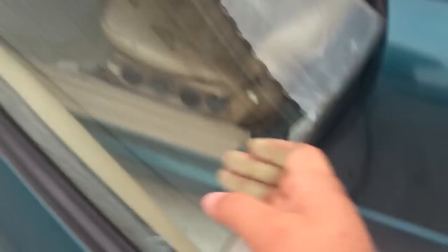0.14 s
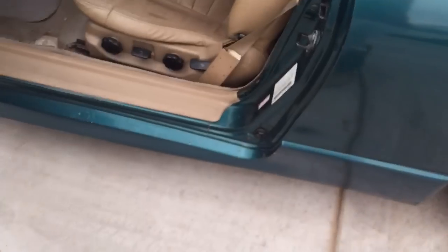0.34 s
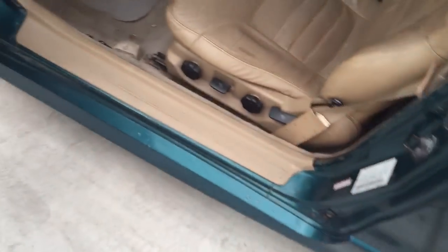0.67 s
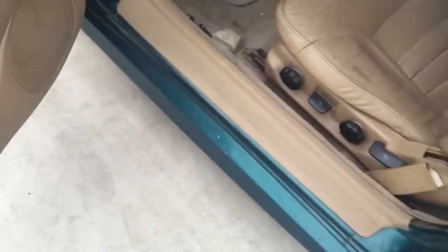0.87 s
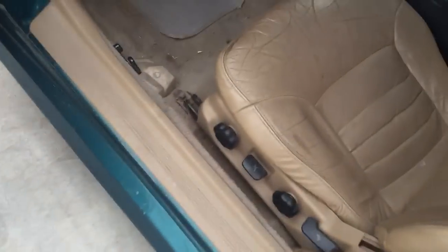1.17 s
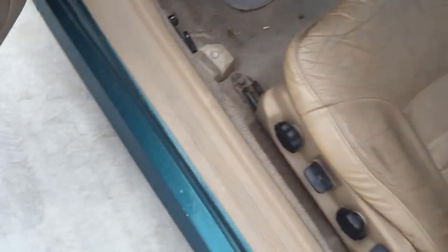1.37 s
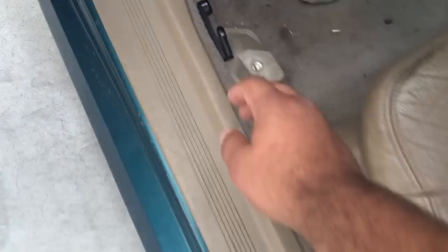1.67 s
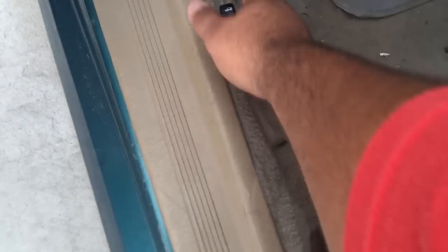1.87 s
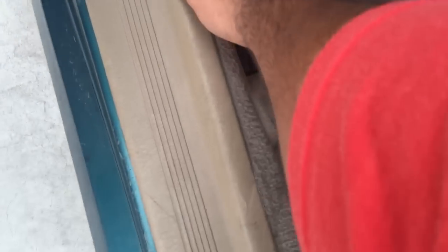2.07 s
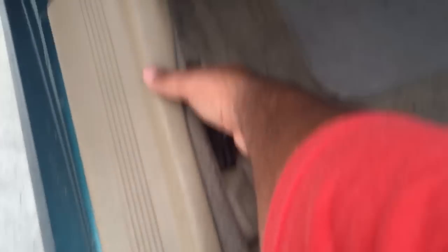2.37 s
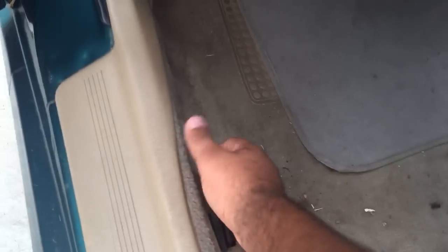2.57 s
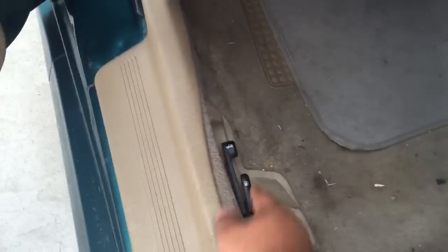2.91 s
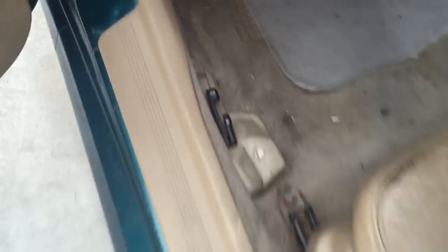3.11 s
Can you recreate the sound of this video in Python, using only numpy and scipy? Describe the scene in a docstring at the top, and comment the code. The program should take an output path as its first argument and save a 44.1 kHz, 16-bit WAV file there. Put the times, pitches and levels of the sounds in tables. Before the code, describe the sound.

A car door clicks off its catch at 0 and 0.1 s, its hinge rubbing unevenly with tiny squeaks until 0.85 s; hollow panel knocks land at 0.59 and 0.73 s. Clothing brushes near 1.1 s, a soft door bump at 1.6 s, faint trim taps around 2.2 s, carpet rubs at 2.6 s. A lever thumps dully at 2.7 s, ticks, scrapes, then clacks loudest at 2.92 s. Close, dry, quiet outdoor air, low wind buffets.

```python
"""A car door swings open outdoors: the hinge rubs, the check strap knocks the panel, clothes brush past.
Then a hand pulls a floor lever: a dull thump, two ticks, a short scrape and a sharp latch clack.
Wind buffets the microphone. Blows ring clusters of decaying modes and leave a crack of noise; rubs, brushes,
scrape and wind are shaped noise; squeaks are narrow-band noise; faint tones and low bumps are sines."""
import sys
import numpy as np
from scipy import signal
from scipy.fft import rfft, irfft, next_fast_len
from scipy.io import wavfile
from scipy.ndimage import uniform_filter1d, map_coordinates

SR = 44100
rng = np.random.default_rng(int(sys.argv[2]) if len(sys.argv) > 2 else 0)


def file_out(sig):
    """Save sig as 16-bit WAV at sys.argv[1]."""
    # one column per channel
    cols = np.atleast_2d(sig).T
    # limit, then scale
    lim = np.clip(cols, -1, 1)
    pcm = np.round(lim * 32767).astype(np.int16)
    wavfile.write(sys.argv[1], SR, pcm)


def voltage_ratio(level):
    """Linear amplitude factor for a level in decibels (scalar or array-like)."""
    return 10 ** (np.asarray(level, float) / 20)


N = 143325

# crack spectrum of the door: (frequency [Hz], density [dB])
DOOR_CRACK_COLOUR = [(710, -18), (1200, -10.5), (2190, -2.5), (4830, -10), (5980, -8), (8700, -19.5),
                     (9680, -29), (12000, -19), (15500, -31)]
DOOR_CRACK_T60_S = 0.092


def unit(x):
    """Scaled to rms 1."""
    return x / np.sqrt(np.mean(x ** 2) + 1e-20)


def peak(x):
    """Scaled so that its strongest 5 ms has rms 1."""
    return x / np.sqrt(np.abs(uniform_filter1d(x ** 2, SR // 200)).max() + 1e-20)


def curve(rows):
    """One value per sample from (time [s], value) rows."""
    return np.interp(np.arange(N) / SR, *np.transpose(rows))


def wobble(rate_hz):
    """A smooth random curve, rate_hz knots a second."""
    knots = rng.standard_normal(int(N * rate_hz / SR) + 4)
    return map_coordinates(knots, [np.arange(N) * rate_hz / SR])


def noise(spectrum, size, tilt_db=0):
    """Noise of rms 1 coloured by (Hz, dB) points, tilted by tilt_db per octave about 4 kHz."""
    m = next_fast_len(size)
    hz, db = np.transpose(spectrum)
    octave = np.log2(np.fft.rfftfreq(m, 1 / SR) + 1)
    colour_db = np.interp(octave, np.log2(hz), db, left=-120, right=-120)
    gain = voltage_ratio(colour_db + tilt_db * (octave - np.log2(4000)))
    return unit(irfft(rfft(rng.standard_normal(m)) * gain, m)[:size])


def add(track, s, x):
    """Mixes x into the track at s seconds."""
    part = track[max(round(s * SR), 0):][:len(x)]
    part += x[:len(part)]


def ringing(modes, contact, t, spread):
    """Every mode is a cluster of close, detuned partials, new for each blow and set going by the contact."""
    phase_scatter_rad = 1.36  # partials start roughly together, then drift apart
    hz, db, t60_s = np.transpose(modes)[:, :, None, None]
    draw = rng.standard_normal((3, len(modes), 14, 1))
    decay = voltage_ratio(-60 * t / (t60_s * np.exp(0.23 * draw[0])))
    phase = 2 * np.pi * hz * (1 + spread * draw[1]) * t + phase_scatter_rad * draw[2]
    onset = 1 - np.exp(-hz * t)
    clusters = (decay * np.sin(phase) * onset).sum(axis=1)
    rung = signal.fftconvolve(clusters, contact[None], axes=1)[:, :len(t)]
    highpass = signal.butter(2, 0.69 * hz.min(), "high", fs=SR, output="sos")
    rung = signal.sosfilt(highpass, rung)
    return peak(sum(voltage_ratio(mode_db) * peak(one) for mode_db, one in zip(db.ravel(), rung)))


def hits(events, low_modes, mid_modes, crack, crack_t60_s, low_spread, mid_spread):
    """Each blow is a short rough contact that rings two sets of modes and leaves a dying crack."""
    echo_db, echo_t60_s, echo_tilt_db = -23, 0.15, -4.5  # lingering echo of the crack; tilt per octave
    grit_db = 2.5  # unevenness of the crack
    track, t = np.zeros(N), np.arange(SR // 3) / SR
    for s, crack_db, low_db, mid_db, contact_s in events:
        u = t / contact_s
        contact = (rng.standard_normal(len(t)) * np.sqrt(u) * np.exp(-2 * u * u))[:SR // 5]
        after_s = np.maximum(t - 0.81 * contact_s, 0)
        echo = voltage_ratio(echo_db - 60 * after_s / echo_t60_s) * noise(crack, len(t), echo_tilt_db)
        direct = voltage_ratio(-60 * after_s / crack_t60_s) * noise(crack, len(t))
        snap = (1 - np.exp(-8 * u)) * (direct + echo)
        grit = voltage_ratio(grit_db * wobble(300)[:len(t)])
        low = voltage_ratio(low_db) * ringing(low_modes, contact, t, low_spread)
        mid = voltage_ratio(mid_db) * ringing(mid_modes, contact, t, mid_spread)
        add(track, s, low + mid + voltage_ratio(crack_db) * peak(grit * snap))
    return track


def strokes(rows, colour):
    """Short strokes: patchy, grainy noise that swells under the stroke and dies away after it."""
    swell_share, fade_t60_s = 0.5, 0.039  # swell as share of the stroke
    patch_db, fibre_db, slow_db = 3, 1, 1.8
    track, t = np.zeros(N), np.arange(SR // 2) / SR
    for s, length_s, db, tilt_db in rows:
        swell = np.sin(np.pi / 2 * np.clip(t / (swell_share * length_s), 0, 1))
        fading = voltage_ratio(-60 * np.maximum(t - 0.86 * length_s, 0) / fade_t60_s)
        add(track, s, voltage_ratio(db) * swell * fading * noise(colour, len(t), tilt_db))
    z = signal.stft(track, nperseg=128)[2]
    field = uniform_filter1d(rng.standard_normal(z.shape), 4, axis=0)
    field = uniform_filter1d(field, 4, axis=1)
    patchy = signal.istft(z * unit(voltage_ratio(patch_db * unit(field))), nperseg=128)[1][:N]
    return patchy * unit(voltage_ratio(fibre_db * wobble(500) + slow_db * wobble(70)))


def hush():
    """Quiet outdoor air: steady coloured noise, slightly wavering."""
    # (frequency [Hz], density [dB])
    air_colour = [(41, -31), (70, -10), (118, -3), (151, -11), (186, -4.5), (342, -16.5), (481, -21.5),
                  (564, -18), (676, -26.5), (887, -23.5), (1090, -26), (9170, -37), (15800, -42)]
    return voltage_ratio(-65 + 0.7 * wobble(3)) * noise(air_colour, N)


def wind():
    """Wind lumps on the microphone: low noise under a gust envelope."""
    # (time [s], level [dB])
    gusts = [(0.0, -45.5), (0.32, -100), (0.37, -50), (0.42, -63), (0.44, -51), (0.54, -74), (0.61, -70),
             (0.74, -67), (0.93, -47), (1.03, -58.5), (1.24, -69), (1.27, -43), (1.28, -44), (1.33, -59),
             (1.36, -52), (1.43, -95), (1.49, -54), (1.57, -96), (1.76, -60), (1.8, -79), (1.99, -55.5),
             (2.05, -70.5), (2.3, -53), (2.33, -65.5), (2.705, -59.5), (2.72, -37), (2.74, -45),
             (2.85, -49.5), (3.18, -69), (3.25, -66)]
    # (frequency [Hz], density [dB])
    buffet_colour = [(20, -50), (35, -20.5), (55, 4), (85, -4), (130, -7), (250, -29.5)]
    return voltage_ratio(curve(gusts)) * noise(buffet_colour, N)


def faint_tones():
    """Faint held sines, wavering in level and pitch."""
    # (frequency [Hz], level [dB], start [s], end [s])
    tone_rows = [(563, -73, 1.84, 2.85), (333, -76.5, 0.79, 1.85)]
    fade_s = 0.089
    t, track = np.arange(N) / SR, np.zeros(N)
    for hz, db, from_s, to_s in tone_rows:
        on = np.clip((t - from_s) / fade_s, 0, 1) * np.clip((to_s - t) / fade_s, 0, 1)
        sine = np.sin(2 * np.pi * np.cumsum(hz + 3 * wobble(15)) / SR)
        track += np.sqrt(2) * voltage_ratio(db) * on * voltage_ratio(1.2 * wobble(12)) * sine
    return track


def pushes():
    """Soft bumps on the microphone: a few cycles of low pressure, swelling and fading, sagging in pitch."""
    # (time [s], length [s], mean pitch [Hz], level [dB])
    bumps = [(1.262, .05, 82, -40), (1.34, .04, 65, -47)]
    track, t = np.zeros(N), np.arange(SR // 8) / SR
    for s, length_s, hz, db in bumps:
        u = np.clip(t / length_s, 0, 1)
        phase = 2 * np.pi * hz * t * (1.3 - 0.3 * u) + rng.uniform(0, 2 * np.pi)
        add(track, s, voltage_ratio(db) * peak(np.sin(np.pi * u) * np.sin(phase)))
    return track


def brushes_and_scrape():
    """Clothes brushing past, and at 2.913 s a short scrape leading into the latch clack: noise strokes."""
    # (start [s], length [s], level [dB], tilt [dB/octave])
    stroke_rows = [(0.326, 0.043, -51.5, -8.5), (0.396, 0.42, -72, 2), (0.865, 0.053, -64.5, 2),
                   (.915, 0.035, -69, 3), (1.124, 0.04, -47, 3.5), (1.17, 0.031, -63.5, 8),
                   (1.286, 0.041, -67, 10.5), (2.035, 0.023, -74, 6), (2.913, 0.0086, -46, 3)]
    # (frequency [Hz], density [dB])
    stroke_colour = [(530, -50.5), (900, -14.5), (1610, -3), (2250, -12), (2510, -9), (4080, -10),
                     (5120, -13), (10300, -23.5), (14100, -26), (15500, -27)]
    return strokes(stroke_rows, stroke_colour)


def carpet_rubs():
    """The hand rubbing over carpet: strokes of pile noise."""
    # (start [s], length [s], level [dB], tilt [dB/octave])
    rub_rows = [(2.573, 0.029, -61, -2.5), (2.596, .011, -56, 0), (2.612, .042, -60, -1.5),
                (2.99, 0.037, -66, -2), (3.022, 0.044, -61, 0.5), (3.09, 0.029, -77, 4)]
    # (frequency [Hz], density [dB])
    pile_colour = [(530, -37), (900, -6), (1050, 0.5), (2070, -8), (3940, -3), (7060, -3.5), (10800, -15),
                   (13800, -14), (15500, -23)]
    return strokes(rub_rows, pile_colour)


def ticks():
    """Tiny dry contacts: noise that dies within milliseconds."""
    # (time [s], onset level [dB], tilt [dB/octave])
    tick_rows = [(.1058, -36, -5), (.346, -53, -7), (.513, -54, -10), (.738, -34, -8), (.812, -56, -12),
                 (1.305, -56.5, -1), (2.103, -62, 0), (2.2, -58, -6.5), (2.5975, -47, -3), (2.723, -57, 11),
                 (2.885, -49, 1)]
    # (frequency [Hz], density [dB])
    tick_colour = [(500, -35), (1000, 0), (15000, -0.5), (15800, -20.5)]
    t60_s = 0.011
    track, t = np.zeros(N), np.arange(SR // 20) / SR
    for s, db, tilt_db in tick_rows:
        add(track, s, voltage_ratio(db - 60 * t / t60_s) * noise(tick_colour, len(t), tilt_db))
    return track


def squeaks():
    """Hinge, seal and trim squeak: brief slips that excite one narrow resonance."""
    # (time [s], length [s], frequency [Hz], level [dB])
    squeak_rows = [(0.215, 0.035, 1280, -55.5), (0.338, 0.023, 2450, -42), (.49, 0.068, 2170, -55.5),
                   (0.495, 0.052, 960, -51), (0.652, .03, 2670, -68), (0.699, 0.023, 2000, -55.5),
                   (0.802, 0.033, 640, -50.5), (0.824, 0.032, 2447, -54), (1.3, 0.015, 2604, -61),
                   (1.765, 0.035, 2350, -74), (2.196, 0.018, 1287, -61), (2.268, 0.031, 2190, -67.5),
                   (2.535, 0.017, 1450, -65.5)]
    share = 0.028  # band half-width at -4 dB, as share of the pitch
    track, t = np.zeros(N), np.arange(SR // 5) / SR
    for s, length_s, hz, db in squeak_rows:
        band = [(hz * (1 + k * share), edge_db) for k, edge_db in ((-3, -30), (-1, -4), (0, 0), (1, -4), (3, -30))]
        swell = np.sin(np.pi * np.clip(t / length_s, 0, 1))
        add(track, s, voltage_ratio(db) * peak(swell * noise(band, len(t))))
    return track


def trim_taps():
    """Soft taps of hand and trim, ringing short damped modes."""
    # (time [s], crack [dB], low modes [dB], trim [dB], contact [s])
    tap_rows = [(.513, -74, -72.5, -67, 0.006), (1.168, -69, -50.5, -69, 0.015),
                (1.48, -73, -66, -68, 0.012), (1.7, -78, -54.5, -64, 0.027), (2.2, -69, -55.5, -65, 0.022),
                (2.256, -75, -58, -60, 0.0084), (2.28, -73, -57.5, -55, 0.0062),
                (2.4, -74, -64.5, -64, 0.0069), (2.545, -70.5, -65, -66, 0.012),
                (3.224, -74.5, -57.5, -59.5, 0.008)]
    # low, then mid modes: (frequency [Hz], level [dB], t60 [s])
    trim_low = [(239, -15, 0.13), (323, 9, 0.07), (422, -2.5, 0.07)]
    trim_mid = [(640, 12.5, 0.065), (850, 2, 0.15), (1197, 2, 0.033), (1414, -6, 0.035)]
    # (frequency [Hz], density [dB])
    trim_crack = [(1200, -39), (1900, 13), (2400, 3), (3500, 1.5), (7000, -9), (15000, -18)]
    return hits(tap_rows, trim_low, trim_mid, trim_crack, 0.062, low_spread=0.098, mid_spread=0.0676)


def lever_thump():
    """The lever gives way: floor pan and carpeted floor ring dully."""
    # (time [s], crack [dB], floor pan [dB], carpeted floor [dB], contact [s])
    thump_rows = [(2.707, -58, -31, -35.5, 0.022), (2.733, -70, -29, -41, 0.015),
                  (2.775, -78, -39, -53, .014), (2.803, -84.5, -43, -58.5, .014)]
    # modes: (frequency [Hz], level [dB], t60 [s])
    floor_pan = [(59.6, -13.5, 0.4), (95, -8.5, 0.3), (126.6, -10, 0.16), (169.3, 3, 0.25),
                 (226.8, -6, 0.17), (280.1, -5, 0.24), (344, -2.5, 0.3)]
    carpet = [(463, -2.5, 0.24), (517, -3, 0.22), (613, 1, .2), (735, 1.5, .17), (960, -0.5, 0.12),
              (1097, -7, 0.08), (1250, -6.5, 0.09), (1450, -13, .09), (1680, -15.5, .09),
              (1950, -15.5, .09)]
    # (frequency [Hz], density [dB])
    thump_crack = [(1500, -9), (2300, 2), (3200, -9.5), (4300, -7.5), (6000, -19.5), (15500, -23)]
    return hits(thump_rows, floor_pan, carpet, thump_crack, 0.12, low_spread=0.09, mid_spread=0.09)


def latch():
    """Two ticks and a sharp clack: hard, short contacts ring the latch and its bracket."""
    # (time [s], crack [dB], low modes [dB], bracket [dB], contact [s])
    blow_rows = [(2.885, -50, -60.5, -50.5, 0.0072), (2.899, -50, -52, -39, 0.0053),
                 (2.9198, -20, -33, -19, 0.0032), (2.9245, -28, -30, -22.5, 0.0036)]
    # modes: (frequency [Hz], level [dB], t60 [s])
    latch_low = [(222.2, -0.5, .1), (290, 4.5, 0.11), (362.5, 1, 0.1), (471, -3, 0.097)]
    bracket = [(542.6, -5, 0.08), (651.5, -7.5, 0.065), (767, -5, 0.057), (965, -7, 0.05), (1186, -1, .035),
               (1469, 2, .035), (1690, -3.5, 0.03), (2510, -5.5, 0.042), (2710, -10.5, .03)]
    # (frequency [Hz], density [dB])
    latch_crack = [(880, -29.5), (1500, -5.5), (2050, -11), (2570, -5), (3070, -14.5), (3360, -9),
                   (5070, -15), (5640, -8), (6700, -10), (7740, -22), (8620, -16.5), (10300, -20.5),
                   (14000, -16.5), (15700, -22.5)]
    return hits(blow_rows, latch_low, bracket, latch_crack, 0.035, low_spread=0.08, mid_spread=0.035)


def door_release():
    """The door leaves its catch and seal: blows ring the door edge and panel."""
    # (time [s], crack [dB], edge [dB], panel [dB], contact [s])
    release_rows = [(0, -50, -41, -41, 0.0052), (.1055, -37, -54, -37.5, 0.0047),
                    (.226, -63, -66, -49, 0.017), (.297, -66, -45.5, -43, 0.0083),
                    (.328, -51.5, -35.5, -46, 0.028), (.345, -51, -48, -41, 0.0092)]
    # edge, then panel modes: (frequency [Hz], level [dB], t60 [s])
    edge_modes = [(264, -5.5, 0.13), (304.8, -1, .2), (407, -6, 0.046)]
    panel_modes = [(588, -3, 0.1), (690, -2.5, 0.045), (863, -8.5, 0.048), (1280, -8.5, 0.11),
                   (1465, -9, 0.04)]
    # (frequency [Hz], density [dB])
    release_crack = [(880, -48), (1500, -9), (1700, -5.5), (2400, -3.5), (3800, -10), (4100, -7),
                     (4850, -17), (6130, -17), (14600, -36.5), (15500, -37)]
    return hits(release_rows, edge_modes, panel_modes, release_crack, 0.11, low_spread=0.038, mid_spread=0.0425)


def door_rest():
    """The door comes to rest: one soft blow rings its boom and panel."""
    # (time [s], crack [dB], boom [dB], panel [dB], contact [s])
    rest_rows = [(1.606, -60, -44.5, -50.5, 0.005)]
    # boom, then panel modes: (frequency [Hz], level [dB], t60 [s])
    rest_boom = [(146.6, -9.5, 0.66), (226, -2, 0.47), (344, 1, 0.36), (443, 1, 0.05)]
    rest_panel = [(701, -4, 0.091), (826, -2, 0.095), (1150, -4, .045), (1450, -0.5, 0.076),
                  (1850, -11, 0.085), (2750, -9.5, 0.093)]
    return hits(rest_rows, rest_boom, rest_panel, DOOR_CRACK_COLOUR, DOOR_CRACK_T60_S,
                low_spread=0.0205, mid_spread=0.027)


def hinge():
    """Uneven friction of the swinging door drives resonances that waver singly and shift with the load."""
    # the swing and the later settling: (time [s], level [dB], load [0-1])
    swing = [(0, -51.5, 0.3), (.08, -53, 0.12), (.15, -51, 0.05), (.24, -51, 0), (.27, -54, .3),
             (.3, -51.5, .2), (.4, -57, 0.55), (.52, -53.5, 0.97), (.6, -51, 0.7), (.72, -54, 1),
             (.77, -53, .9), (.82, -56.5, 0.46), (.88, -70, 0.5), (1.05, -75.5, 0.7), (1.58, -80, .8),
             (1.631, -66, 0.7), (1.718, -69.5, .7), (1.8, -75, .7), (1.95, -90, 0.6)]
    # (frequency [Hz], bandwidth of one pass [Hz], level [dB], change at full load [dB])
    resonances = [(365, 180, -4.5, 2), (650, 160, -5.5, -2.5), (979, 230, -10, 4.5), (1280, 420, -12, -12),
                  (1600, 450, -13, -12), (2097, 230, -10.5, 0.5), (2600, 240, -12, -6), (3350, 480, -9, -6),
                  (5970, 6300, -25, 2)]
    s, swing_db, load = np.transpose(swing)
    swing_db, load = curve(np.c_[s, swing_db]), curve(np.c_[s, load])
    slips = rfft(rng.standard_normal(N) * voltage_ratio(3 * wobble(150)))
    f = np.fft.rfftfreq(N, 1 / SR)
    track = np.zeros(N)
    for hz, width_hz, db, load_db in resonances:
        bandpass = 1j * f * width_hz / (hz * hz - f * f + 1j * f * width_hz)
        rub = unit(irfft(slips * bandpass ** 2, N))  # two passes
        track += voltage_ratio(swing_db + db + load * load_db + 2.2 * wobble(13.92)) * rub
    return track


def strap_knocks():
    """The check strap knocks the door: the skin booms and the panel rings."""
    # (time [s], crack [dB], boom [dB], panel [dB], contact [s])
    knock_rows = [(0.588, -33, -28, -28, 0.015), (0.7335, -43.5, -38, -39, 0.0075),
                  (0.8094, -61.5, -49, -50.5, 0.0038)]
    # door skin, then panel modes: (frequency [Hz], level [dB], t60 [s])
    skin_boom = [(147, -12, 0.56), (185, -17.5, 0.32), (218.4, -1, 0.324), (266, -17, 0.17)]
    door_panel = [(324.5, -1, 0.23), (408.6, -0.5, 0.12), (466.6, -2.5, 0.16), (565, 5.5, 0.13),
                  (671, 1, 0.15), (850, -5, 0.095), (1102, -6, 0.085), (1347, -8.5, 0.091),
                  (1460, -4.5, 0.062)]
    return hits(knock_rows, skin_boom, door_panel, DOOR_CRACK_COLOUR, DOOR_CRACK_T60_S,
                low_spread=0.0075, mid_spread=0.0599)


def scene():
    """All sources, one microphone."""
    background = hush() + wind() + faint_tones() + pushes()
    contacts = brushes_and_scrape() + carpet_rubs() + ticks() + squeaks() + trim_taps()
    lever = lever_thump() + latch()
    door = door_release() + door_rest() + hinge() + strap_knocks()
    return (background + contacts + lever + door)[None]


def low_pass(x):
    """Removes everything above the highest recorded frequency."""
    return signal.sosfilt(signal.butter(12, 16460, fs=SR, output="sos"), x)


def record(dry):
    """The finished mix."""
    return low_pass(dry)


dry = scene()
out = record(dry)
file_out(out)
```